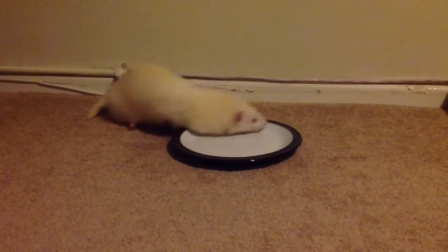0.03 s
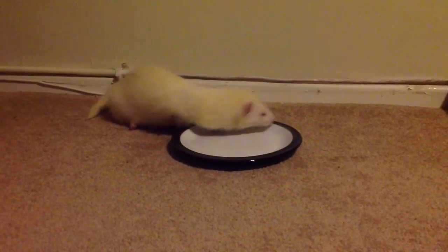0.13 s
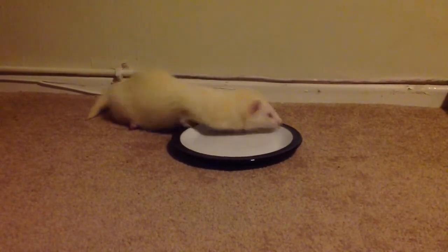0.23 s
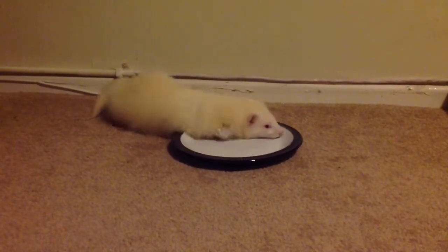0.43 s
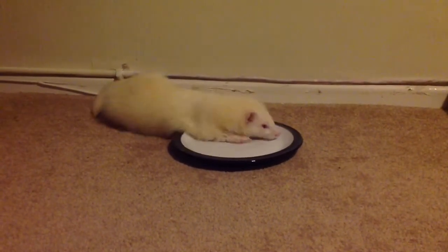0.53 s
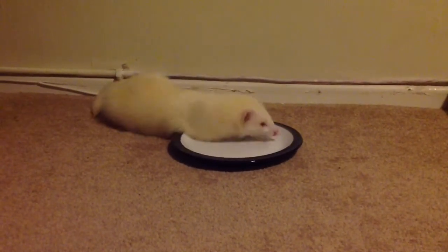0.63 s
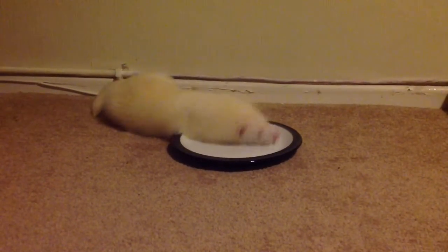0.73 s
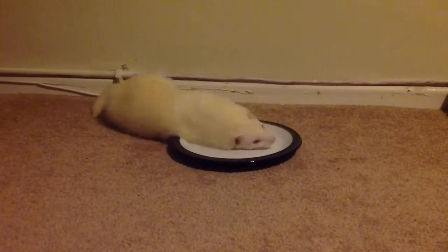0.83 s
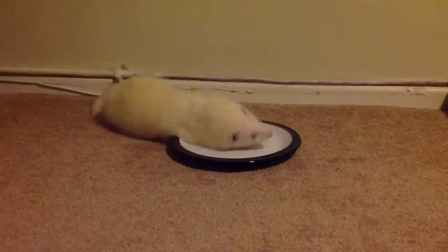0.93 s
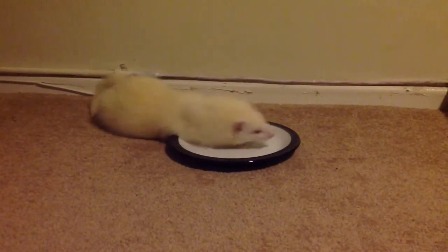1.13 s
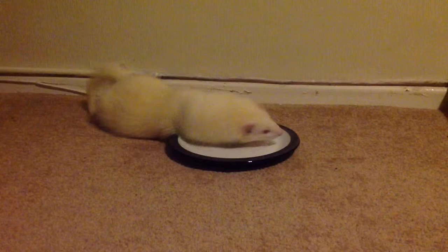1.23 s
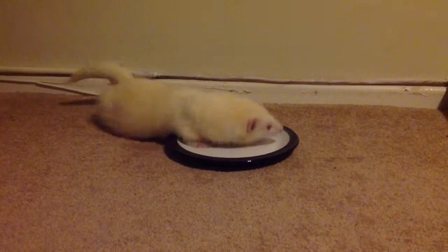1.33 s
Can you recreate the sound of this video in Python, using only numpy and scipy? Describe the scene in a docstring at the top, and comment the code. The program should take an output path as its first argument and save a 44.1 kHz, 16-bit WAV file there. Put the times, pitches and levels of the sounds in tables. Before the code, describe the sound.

A ceramic plate thuds softly on carpet as a small animal shoves it, briefly creaking.

```python
"""A ferret shoves a ceramic plate over carpet in a quiet room.
Each bump rocks the plate with a dull thud, and one push ends in a short creak as it sticks and slips.
Touches on the rim make the plate ring faintly, and claws tick on the glaze.
A steady hiss lies under it all."""
import sys
import numpy as np
from scipy import signal
from scipy.fft import rfft, irfft
from scipy.io import wavfile

SR = 44100
rng = np.random.default_rng(int(sys.argv[2]) if len(sys.argv) > 2 else 0)


def to_wav(s):
    """Save 16-bit WAV."""
    ch = np.atleast_2d(s).T  # columns
    pcm = np.round(np.clip(ch, -1, 1) * 32767)  # PCM
    wavfile.write(sys.argv[1], SR, pcm.astype(np.int16))


N = 61739
TIME = np.arange(N) / SR
BODY_Q = 1.186   # the plate rocking on carpet; a low Q means the ringing stops quickly


def from_db(db):
    """Turn decibels into a number to multiply the sound by."""
    return 10 ** (np.asarray(db) / 20)


def click(start, db):
    """A push packed into one sample; 0 dB pushes as much as 2.5 ms at full scale."""
    out = np.full(N, 1e-18)
    out[int(start * SR)] = from_db(db) * SR / 400
    return out


def dying(start, t60):
    """A fade that begins at start and falls by 60 dB in t60 seconds."""
    return (TIME >= start) * np.exp(-np.log(1000) * np.maximum(TIME - start, 0) / t60)


def ring(start, hz, t60, attack_s):
    """A pure tone that swells quickly and dies away."""
    age = np.maximum(TIME - start, 0)
    swell = 1 - np.exp(-age / attack_s)
    return dying(start, t60) * swell * np.sin(2 * np.pi * hz * age)


def damped(x, hz, q):
    """A vibration that dies fast: a filter that keeps the band around hz, applied three times."""
    angle = 2 * np.pi * min(hz, .45 * SR) / SR
    width = np.sin(angle) / (2 * q)
    band = np.array([width, 0, -width, 1 + width, -2 * np.cos(angle), 1 - width]) / (1 + width)
    return signal.sosfilt([band] * 3, x)


def cut_lows(x, hz):
    """Weaken everything below hz."""
    return signal.sosfilt(signal.butter(2, hz, "high", fs=SR, output="sos"), x)


def hiss():
    """Steady microphone hiss over a soft room rumble."""
    # the shape of the noise from low to high: f/Hz, relative level/dB
    noise_shape = [(30, -31), (60, -19), (100, -4), (180, 3), (350, -5), (700, -10.5), (1450, -8),
                   (2600, -14.5), (6000, -16), (10000, -16), (15000, -18.5)]
    hz, db = np.transpose(noise_shape)
    freqs = np.maximum(np.fft.rfftfreq(N, 1 / SR), 1)
    gains = from_db(np.interp(np.log(freqs), np.log(hz), db))
    noise = irfft(rfft(rng.standard_normal(N)) * gains, N)
    return from_db(-63) * noise / noise.std()


def room(x, db, t60):
    """The sound plus the short, thin wash of echoes in a carpeted room."""
    tail = rng.standard_normal(N) * dying(start=.012, t60=t60)
    echoes = signal.fftconvolve(x, tail / np.linalg.norm(tail))[:N]
    return x + from_db(db) * cut_lows(echoes, hz=295)


def ticks():
    """Claws catch the glaze in short, bright scratches."""
    # claw scratches: t/s, level/dB, time to fade by 60 dB/s
    scratches = [(0.323, -68.5, 0.02), (0.5425, -62, 0.009), (0.945, -59.5, .07), (0.985, -60, .02),
                 (1.2185, -46, 0.0098), (1.221, -48, 0.0047)]
    noise = damped(rng.standard_normal(N), hz=8650, q=1.45)
    loudness = sum(from_db(db) * dying(start, t60) for start, db, t60 in scratches)
    return noise / noise.std() * loudness


def clinks():
    """Touches ring the plate: the spot sets which tones stand out, and a soft touch loses the highs."""
    # the plate's own tones: f/Hz, time to fade by 60 dB/s, level at spot 0/dB, level at spot 1/dB
    plate_tones = [(2013, .4, -66, -83), (2053, .28, -85, -78), (2300, .18, -58, -90), (3311, .2, -62, -85),
                   (3822, .1, -56, -73), (3867, .25, -67, -80), (5218, .28, -69, -85),
                   (5300, .38, -69, -70), (5604, .28, -51.5, -70), (7034, .1, -76, -65),
                   (7531, .3, -69, -85), (8101, .115, -66, -51), (8174, .08, -75, -62),
                   (9555, .1, -60, -80), (9652, .17, -59, -80), (11222, .19, -63, -85),
                   (11857, .27, -60, -80), (12741, .16, -59, -71)]
    # touches on the rim: t/s, added level/dB, f above which tones weaken/Hz, spot (0 or 1)
    touches = [(0.0547, 2, 40600, 0), (0.0790, -17, 2950, 0), (0.3455, 3, 40000, 1),
               (1.2215, 23.5, 2000, 1), (1.2655, 23, 2020, 1)]
    attack_s = .0016
    tones = np.zeros(N)
    for start, db, contact_hz, spot in touches:
        for hz, t60, *spot_db in plate_tones:
            softening = np.exp(-(hz / contact_hz) ** 2)
            tones += from_db(db + spot_db[spot]) * softening * ring(start, hz, t60, attack_s)
    # a burst of noise stands for the dense ringing early in the first, hardest clink
    first_s = touches[0][0]
    swell = 1 - np.exp(-np.maximum(TIME - first_s, 0) / attack_s)
    crack = swell * damped(rng.standard_normal(N), hz=7000, q=0.082)
    return tones + from_db(-59) * crack / crack.std() * dying(first_s, t60=.12)


def wobbles():
    """The plate rings on briefly at a low pitch as it settles after a push."""
    # wobbles of the plate: t/s, level/dB, f/Hz
    settling = [(0.125, -46.5, 164), (0.7565, -35, 203.7)]
    return sum(from_db(db) * ring(start, hz, t60=0.095, attack_s=0.0015) for start, db, hz in settling)


def delay_lows(x, below_hz, stages):
    """Low tones travel slower through a bending plate; all-pass filters make them arrive late."""
    corner = np.tan(np.pi * below_hz / SR)
    weight = (corner - 1) / (corner + 1)
    return signal.sosfilt([[weight, 1, 0, 1, weight, 0]] * stages, x)


def slips():
    """The plate sticks and slips in a fading creak: each slip is a falling chirp that also rocks it."""
    # small slips: t/s, chirp push/dB, chirp f/Hz, rocking push/dB
    jerks = [(0.7542, -49.5, 603, -40), (0.7615, -39.5, 667, -45), (0.7694, -44, 944, -41.5),
             (0.7829, -43, 627, -35.5), (0.8028, -55.5, 580, -50), (0.8240, -59, 537, -55),
             (0.844, -62, 533, -60.5)]
    creak = np.zeros(N)
    for start, chirp_db, chirp_hz, body_db in jerks:
        creak += damped(click(start, chirp_db), chirp_hz, q=1.7)
        creak += damped(click(start, body_db), hz=203, q=BODY_Q)
    return delay_lows(creak, below_hz=880, stages=7)   # late lows make the pitch fall


def thuds():
    """Each bump rocks the plate two or three times, led by a higher knock that fur softens."""
    # bumps: t/s, rocking push/dB, rocking f/Hz, knock push/dB, knock f/Hz, knock Q, knock top f/Hz
    bumps = [(0.1212, -47, 200, -37.5, 380, 1.04, 520), (0.2000, -14, 200.6, -30, 426, 0.95, 2500),
             (0.4958, -51.5, 184, -49.5, 427, 1.43, 620), (0.7449, -22.5, 213.4, -37.5, 512, 0.93, 890),
             (0.9339, -15, 192.7, -40, 810, 1.26, 1150), (0.96, -41, 189, -87, 500, 1.0, 680),
             (1.036, -44, 216, -63, 400, 1.0, 600), (1.0722, -18, 203, -46.5, 815, 1.6, 2010)]
    out = np.zeros(N)
    for start, body_db, body_hz, knock_db, knock_hz, knock_q, top_hz in bumps:
        rocking = damped(click(start, body_db), body_hz, BODY_Q)
        knock = damped(click(start, knock_db), knock_hz, knock_q)
        soft_knock = signal.sosfilt(signal.butter(5, top_hz, fs=SR, output="sos"), knock)
        out += soft_knock - rocking
    return out


def scene():
    """Plate, claws and hiss in the room, mixed to one channel."""
    shoves = cut_lows(thuds() + slips() + wobbles(), hz=89)   # a small plate gives off no deep bass
    shoves_in_room = room(shoves, db=-21, t60=0.063)
    claws_in_room = room(ticks(), db=-6, t60=0.25)
    return (shoves_in_room + claws_in_room + clinks() + hiss())[None]


def record(dry):
    """Cut off the very highest treble steeply."""
    cutoff_hz = 15350
    return signal.sosfilt(signal.ellip(12, .1, 70, cutoff_hz, fs=SR, output="sos"), dry)


dry = scene()
out = record(dry)
to_wav(out)
```